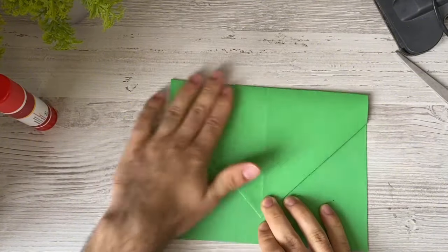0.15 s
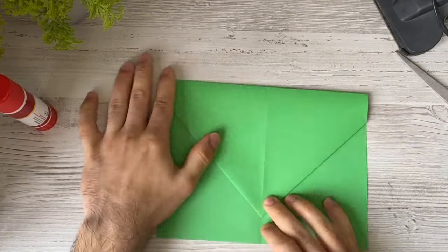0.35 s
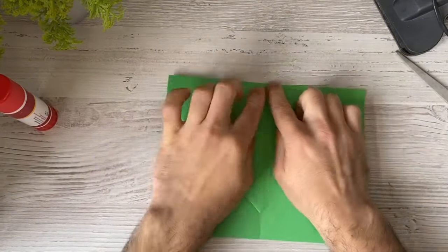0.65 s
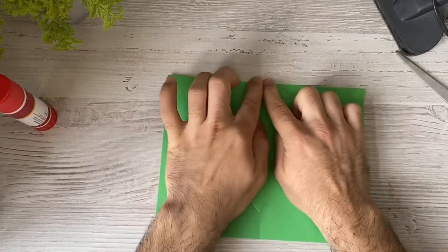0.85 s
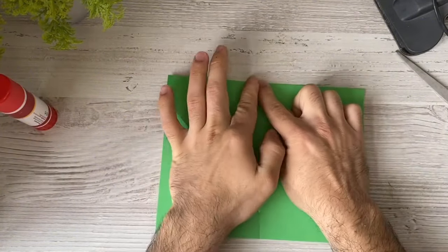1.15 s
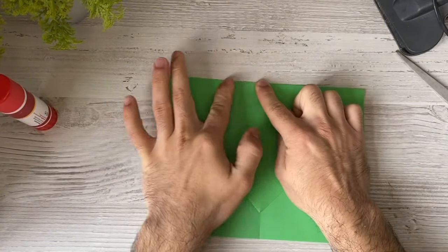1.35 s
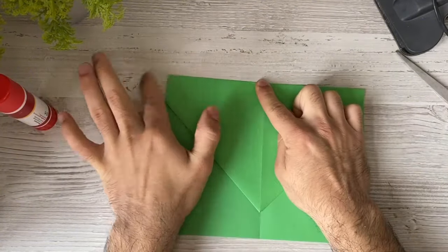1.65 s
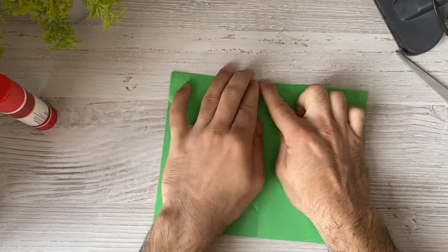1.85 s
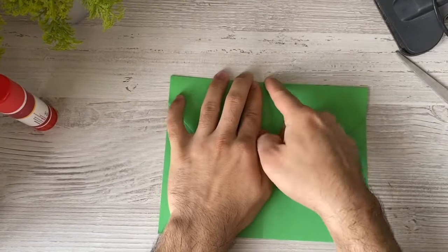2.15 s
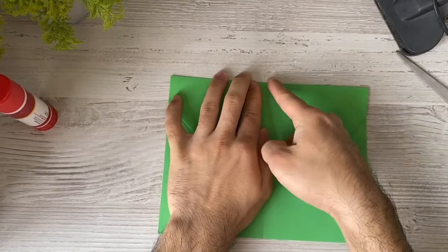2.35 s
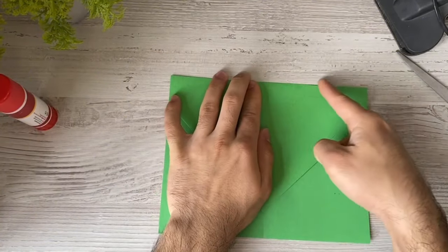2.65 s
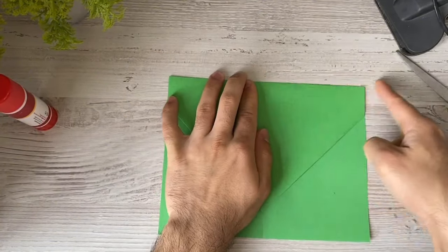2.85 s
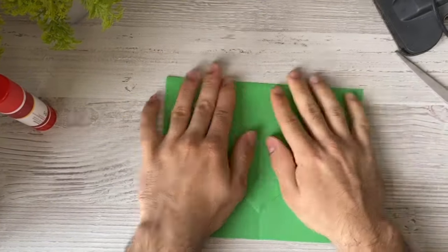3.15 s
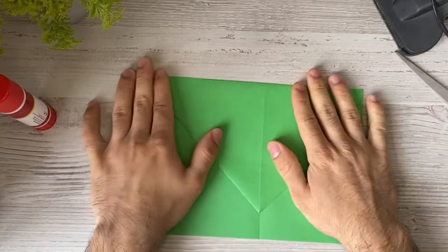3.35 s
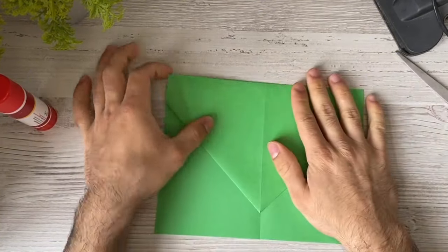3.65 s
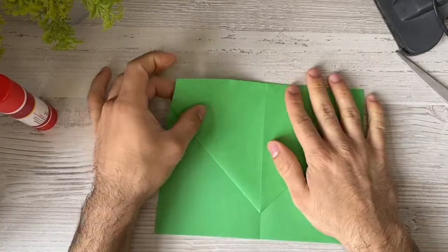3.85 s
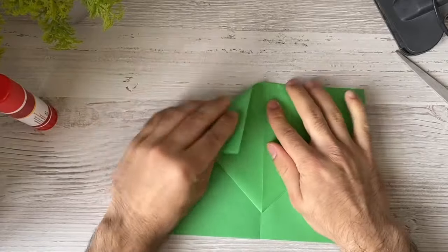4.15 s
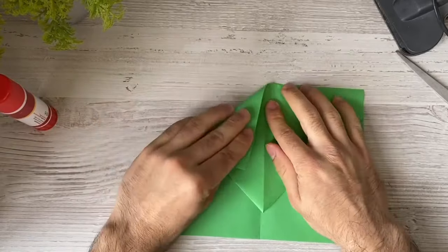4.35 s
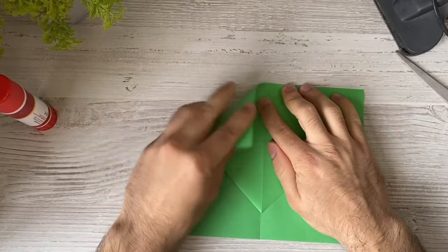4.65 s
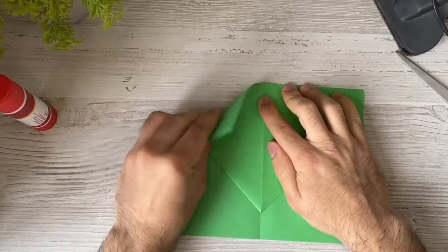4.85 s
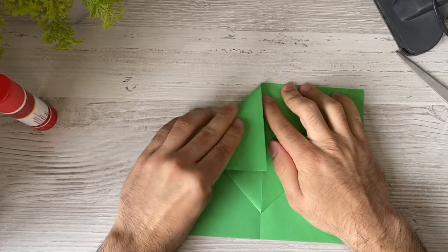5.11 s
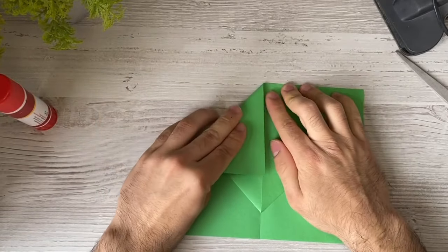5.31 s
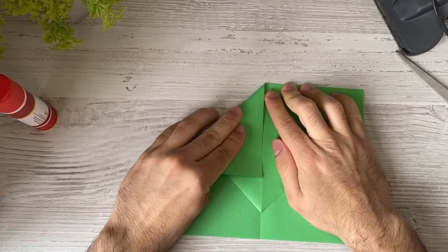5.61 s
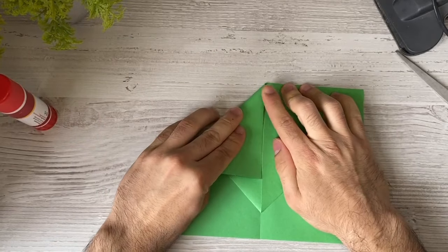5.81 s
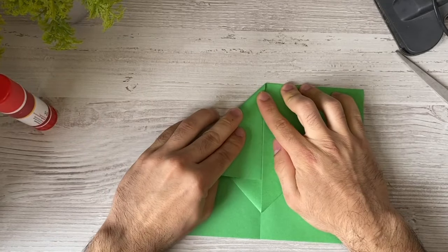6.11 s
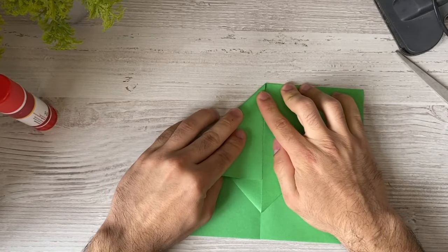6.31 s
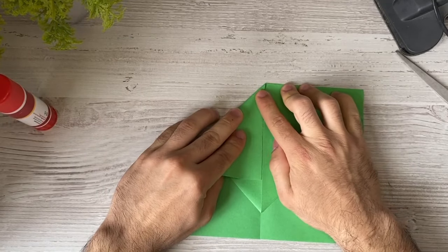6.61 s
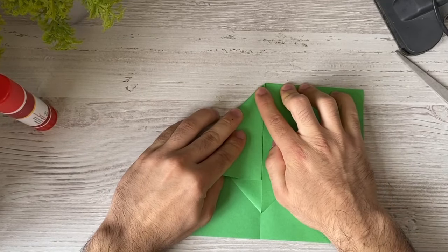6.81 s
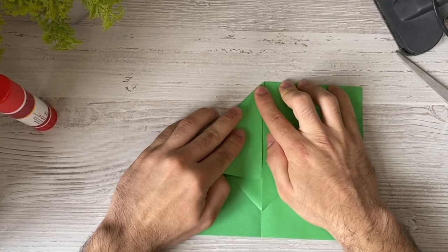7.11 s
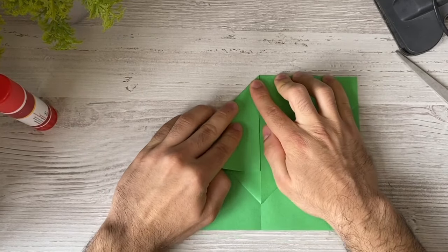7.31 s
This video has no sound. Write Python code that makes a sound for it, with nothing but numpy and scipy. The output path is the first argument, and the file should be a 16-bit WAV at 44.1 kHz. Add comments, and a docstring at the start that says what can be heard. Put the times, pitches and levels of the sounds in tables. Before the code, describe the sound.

Close up at a table in a small dry room, hands smooth stiff paper with thin skin hiss, sparse rustles and soft wooden knocks. Halfway through, a corner is folded over: a cluster of crisp crinkles and snaps, then fading presses broken by a strong pop and isolated clicks. A low wavering drone turns into a steady soft hum underneath.

```python
"""Paper smoothed and folded on a table

Hands smooth a sheet of paper on a wooden table, then bend one corner over and crease it.
Skin hisses as filtered fibre slips; paper crackles as slips through resonances and snaps as noise bursts.
Thumps and drags ring the table's damped modes; sine hum and coloured noise lie underneath.
A short noise tail makes the small room, and the stereo width is shaped by pitch."""
import sys
import numpy as np
from scipy import signal
from scipy.fft import rfft, irfft, next_fast_len
from scipy.io import wavfile
from scipy.ndimage import uniform_filter1d, map_coordinates

SR = 44100
rng = np.random.default_rng(int(sys.argv[2]) if len(sys.argv) > 2 else 0)


def bounce(signal):
    """Save signal as a 16-bit WAV file at the path given by the first command-line argument."""
    frames = np.transpose(np.atleast_2d(signal))
    limited = np.clip(frames, -1, 1)
    pcm = np.round(limited * 32767).astype(np.int16)
    wavfile.write(sys.argv[1], SR, pcm)


N = 329416
T = np.arange(N) / SR  # time in seconds


# A hand smooths the flat sheet; levels are before the swell and sag:
# start_s, length_s, skin_hiss_db, paper_crackle_db
STROKES = [(0.2, 0.2, -65.5, -75), (0.46, 0.025, -85, -70), (0.635, 0.063, -58, -63),
           (0.72, 0.41, -70.5, -65.5), (1.15, 0.39, -68.5, -68), (1.25, 0.34, -59.5, -63.5),
           (1.52, 0.073, -67, -61), (1.765, 0.18, -59, -67.5), (2.031, 0.026, -48.5, -80),
           (2.11, 0.13, -70, -81), (2.38, 0.32, -68.5, -70), (2.515, 0.038, -57.5, -64),
           (2.665, 0.24, -63, -70.5), (2.79, 0.033, -59, -62), (2.86, 0.0098, -73, -66),
           (3.04, 0.04, -66, -66.5), (3.07, 0.037, -62, -54.5), (3.185, 0.037, -53.5, -59.5),
           (3.25, 0.068, -54.5, -64.5), (3.48, 0.27, -64.5, -69), (3.775, 0.13, -58, -64.5)]
STROKE_ATTACK_S, STROKE_RELEASE_S, STROKE_SAG_DB_PER_S = 0.0076, 0.014, 21.5
# Fingers bend the corner over and press the fold; levels are before the swell and sag:
# start_s, length_s, skin_hiss_db, paper_crackle_db
PRESSES = [(3.91, 0.28, -53.5, -53.5), (4.19, 1, -61, -55.5), (4.37, 0.095, -51.5, -50.5),
           (4.54, 0.017, -49, -47.5), (4.64, 0.12, -52.5, -56.5), (4.82, 0.063, -55, -56),
           (4.93, 0.11, -71, -66), (5.07, 0.07, -60.5, -64), (5.28, 0.33, -95, -68.5),
           (5.73, 0.19, -68.5, -56), (5.89, 0.21, -61.5, -53.5), (6.14, 0.38, -78, -65.5),
           (6.5, 0.15, -66, -62), (6.83, 0.11, -62.5, -58), (6.875, 0.11, -57, -53.5),
           (7.06, 0.09, -50.5, -50.5), (7.275, 0.084, -50, -47)]
PRESS_ATTACK_S, PRESS_RELEASE_S, PRESS_SAG_DB_PER_S = 0.058, 0.028, 17
# Hands that rest on the sheet still stir it a little
REST_HISS_DB, REST_CRACKLE_DB = -81, -77.5


def handwork():
    """Gains of skin hiss and paper crackle: the powers of strokes, presses and resting hands add up."""
    strokes = moves(STROKES, STROKE_ATTACK_S, STROKE_RELEASE_S, STROKE_SAG_DB_PER_S)
    presses = moves(PRESSES, PRESS_ATTACK_S, PRESS_RELEASE_S, PRESS_SAG_DB_PER_S)
    resting = undb([[REST_HISS_DB], [REST_CRACKLE_DB]]) ** 2
    return np.sqrt(strokes + presses + resting)


def moves(rows, attack_s, release_s, sag_db_per_s, swell_share=0.13):
    """Power of (hiss, crackle) over time: each move gathers speed, eases off a little and dies away."""
    power = np.zeros((2, N))
    for start, length, skin_db, paper_db in rows:
        t = np.maximum(T - start, 0)
        swell = np.sin(np.pi / 2 * np.minimum(t / (attack_s + swell_share * length), 1))
        sag = undb(-sag_db_per_s * t)
        # the fade is centred two release times after the length is over
        fade = 1 / (1 + np.exp(np.minimum((t - length) / release_s - 2, 20)))
        power += (undb([[skin_db], [paper_db]]) * swell * sag * fade) ** 2
    return power


# The harder the paper is worked, the more the flap rings:
# crackle level at which flap and sheet are equal, and dB of flap gained per dB of crackle
TAUT_DB, TAUT_SLOPE = -55, 0.55
# Share of the crackle's power that comes in separate crinkles when the paper is taut
CRINKLE_SHARE = 0.36
# Colour of the flat sheet's crackle, relative density: pitch_hz, level_db
SHEET_COLOUR = [(200, 1), (600, -2), (950, -2), (1300, 2.5), (1600, -10), (1850, -1.5), (2250, 0.5),
                (3000, 2.5), (4200, -5.5), (5200, -3.5), (6500, -22.5), (11000, -23)]
# Resonances of the flap under the fingers, before they wander; width is for one filter pass:
# pitch_hz, width_hz, level_db
FLAP_RESONANCES = [(1340, 330, -1), (1647, 150, -3.5), (2264, 300, -4.5), (2720, 420, -8.5),
                   (3430, 400, -9), (5120, 550, -7.5)]


def bending(gain, jerk_db=2.5, shift_db=3, glide=0.05):
    """Fibres give way in jerks, now and then a whole crinkle; a taut flap rings with them."""
    slips = grains(rate=3000, spread_db=3)
    slips = slips * undb(jerk_db * walk(120))
    flap = np.zeros(N)
    # the moving fingers damp now one resonance, now another
    for hz, width, db in FLAP_RESONANCES:
        flap += undb(db + shift_db * walk(16)) * band(slips, hz, width)
    # the changing bend retunes them all: read the sound at a wandering speed
    flap = map_coordinates(flap, [np.cumsum(1 + glide * walk(18))], mode="mirror")
    sheet = unit(colour(np.roll(slips, 40), SHEET_COLOUR))  # slips shifted by 40 samples
    taut = (gain / undb(TAUT_DB)) ** TAUT_SLOPE
    crackle = (sheet + taut * unit(flap)) / np.hypot(1, taut)
    share = CRINKLE_SHARE * np.minimum(taut, 1)
    return (np.sqrt(1 - share) * crackle + np.sqrt(share) * crinkles()) * gain


def crinkles(low_hz=1150, high_hz=4600, width_share=0.67, run_s=0.0036):
    """Small patches of the sheet give way at random, each with its own pitch and size."""
    out, t = np.zeros(N), T[:SR // 40]
    count = int(110 * N / SR)  # 110 a second on average
    for when, pitch, size in rng.random((count, 3)):
        hz = low_hz * (high_hz / low_hz) ** pitch
        burst = rng.standard_normal(len(t)) * np.exp(-t / run_s)
        run = band(burst, hz, hz * width_share)
        add(out, when * T[-1], unit(run) * undb(11 * size ** 2))
    return unit(out)


# The paper buckles or is flicked; the burst's envelope peaks at rise_s, level is energy over 2.6 ms:
# start_s, level_db, rise_s, brightness_db_per_octave, flap_pitch_hz
SNAPS = [(0.397, -47.5, 0.0018, 5, 1260), (0.6423, -44, 0.00085, 3, 1450),
         (0.644, -41.5, 0.0045, 3.5, 1450), (0.655, -31, 0.0014, 5.5, 1565), (0.661, -47, 0.003, 2.5, 1380),
         (1.564, -53, 0.0024, -4, 1220), (1.588, -44, 0.0016, -3.5, 1240),
         (2.0417, -50.5, 0.0016, -4.5, 1300), (2.137, -63, 0.0016, -3, 1230),
         (2.546, -44.5, 0.0033, -0.5, 1165), (2.818, -41.5, 0.0067, 0, 1400), (2.873, -49, 0.002, -2, 1410),
         (2.882, -49, 0.003, -4, 1300), (3.084, -46.5, 0.011, 0, 1250), (3.883, -53.5, 0.001, 2, 1400),
         (4.025, -53, 0.0026, 1, 1490), (4.2357, -49, 0.002, -2, 1180), (4.249, -44.5, 0.0026, -2, 1450),
         (4.3168, -47.5, 0.0016, -3, 1130), (4.3958, -36.5, 0.0011, -2.5, 1560),
         (4.412, -40, 0.0019, 1, 1390), (4.435, -43, 0.0022, 0, 1270), (4.446, -35.5, 0.0025, 0, 1310),
         (4.4899, -32.5, 0.001, -3, 1410), (4.517, -32, 0.0015, 0.5, 1330), (4.572, -36.5, 0.0033, 9, 1530),
         (4.89, -51, 0.002, 2, 1280), (5.749, -36.5, 0.0026, 4.5, 1450), (5.752, -19, 0.0019, 1, 1474),
         (5.883, -50, 0.0012, -8, 1380), (5.9697, -32, 0.0027, -1.5, 1290), (6.376, -56, 0.003, 4, 1400),
         (6.629, -36.5, 0.0023, -0.5, 1470), (6.825, -60, 0.0011, -13, 1370), (6.933, -51, 0.002, 4, 1450),
         (6.972, -42.5, 0.0016, -5.5, 1350), (7.055, -48, 0.0016, 1, 1330), (7.082, -41, 0.0016, -14, 1290),
         (7.2655, -34.5, 0.002, -1, 1440), (7.341, -31, 0.0021, -10, 1400),
         (7.352, -29.5, 0.0034, -13, 1430), (7.376, -33.5, 0.0013, 3.5, 1470)]
# Colour of the burst before its brightness tilt, relative density: pitch_hz, level_db
BUCKLE_COLOUR = [(200, -7), (600, -13), (900, -16.5), (1200, -1), (1500, 4.5), (1870, -6), (2300, 1),
                 (3000, -0.5), (3700, -2.5), (4900, -4), (5800, -3.5), (7000, -3), (9000, -15),
                 (12000, -24.5)]
# The stiff sheet ringing after a buckle; each snap rescales pitches and decays so mode one is its pitch:
# pitch_hz, level_db, t60_s
FLAP_MODES = [(1428, 9, 0.011), (1633, -4.5, 0.017), (2253, -5.5, 0.012), (2730, -21, 0.0096),
              (3430, -12.5, 0.012), (4800, -14.5, 0.011)]


def snaps(ring_db=2, build_cycles=6):
    """Each buckle is a quick swelling run of slips; the flap rings with it, higher the tighter it is bent."""
    out, t = np.zeros(N), T[:SR // 10]
    for start, db, rise, tilt_db, pitch in SNAPS:
        swell = (t / rise) ** 1.5 * np.exp(-1.5 * t / rise)
        burst = rng.standard_normal(len(t)) * swell
        flap_time = t * pitch / FLAP_MODES[0][0]
        ring = modes(FLAP_MODES, flap_time, build_cycles, lambda hz: undb(tilt_db * np.log2(hz)))
        buckle = unit(colour(burst, BUCKLE_COLOUR, tilt_db))
        # bright flicks of the edge hardly move the flap
        snap = buckle + undb(ring_db - 2 * tilt_db) * unit(ring)
        add(out, start, blow(snap, db, seconds=0.0026))
    return out


# Colour of skin on paper, relative density: pitch_hz, level_db
SKIN_COLOUR = [(150, -51), (400, -7.5), (1300, -3.5), (3000, -1), (5500, 7.5), (7500, 5), (10500, 5),
               (12000, -2.5)]


def sliding(gain, flutter_db=1.0):
    """Skin ridges catch on paper fibres so densely that they hiss."""
    slips = grains(rate=5000, spread_db=1.5) * undb(flutter_db * walk(70))
    return unit(colour(slips, SKIN_COLOUR)) * gain


# Fingertips shift on the paper; level falls to 1/e at half_length_s from the middle:
# middle_s, half_length_s, pitch_hz, level_db
SWISHES = [(0.87, 0.016, 3350, -62), (0.975, 0.024, 3800, -64.5), (1.096, 0.037, 3480, -68),
           (1.396, 0.035, 2550, -59), (1.581, 0.017, 2270, -55.5), (2.21, 0.03, 3100, -70),
           (2.317, 0.032, 3400, -69), (2.41, 0.028, 3730, -70), (2.884, 0.011, 3050, -57),
           (6.206, 0.037, 3400, -63.5), (6.367, 0.04, 4400, -66), (6.465, 0.027, 4320, -71)]


def swishes(grain_db=3):
    """A fingertip shifts a little: a brief, grainy swish about one pitch."""
    slips = grains(rate=2400, spread_db=1.0) * undb(grain_db * walk(110))
    out = np.zeros(N)
    for middle, half, hz, db in SWISHES:
        swish = unit(band(slips, hz, hz * 0.38))
        out += swish * undb(db) * np.exp(-((T - middle) / half) ** 2)
    return out


# A flat palm sweeps across the sheet: start_s, length_s, level_db
SWEEPS = [(-0.03, 0.25, -47.5), (0.065, 0.1, -52), (3.065, 0.15, -53)]
# Colour of the palm, relative density: pitch_hz, level_db
PALM_COLOUR = [(200, -15), (440, -20), (900, -5), (1300, -18), (1800, -8), (2900, -6.5), (4200, -3.5),
               (5800, -2), (7400, -3), (9500, 1), (11500, -5)]


def sweeps(attack_s=0.015, release_s=0.021, flutter_db=0.7):
    """A whole palm slides over the sheet with a broad, even hiss that dies away as it slows."""
    gain = np.zeros(N)
    for start, length, db in SWEEPS:
        attack = np.clip((T - start) / attack_s, 0, 1)
        release = (1 - np.tanh((T - start - length) / (2 * release_s))) / 2
        gain += undb(db) * attack * release
    slips = grains(rate=11000, spread_db=1.5) * undb(flutter_db * walk(71))
    return unit(colour(slips, PALM_COLOUR)) * gain


# Stereo width of the palm by pitch: pitch_hz, side_level_db
PALM_WIDTH = [(300, 1), (2000, 0), (5000, -2), (7400, 6), (9400, -2), (10500, -20)]


def wide_palm():
    """The palm's hiss is wide: an unrelated second hiss forms the left-right difference."""
    return sweeps() + colour(sweeps(), PALM_WIDTH) * np.array([[1], [-1]])


# Thumps on the table, and one brief low bump as the hum changes; level is energy over 34 ms,
# bass weight fades above bass_hz: start_s, level_db, contact_s, bass_weight_db
TAPS = [(0.657, -33.5, 0.0015, 4), (0.665, -41.5, 0.0009, -13.5), (1.563, -53, 0.0005, -18),
        (1.589, -49, 0.00026, -1), (2.044, -37.5, 0.00058, -2), (2.079, -47, 0.00077, -8),
        (2.124, -51, 0.00047, 0), (2.138, -35, 0.00031, -3.5), (2.156, -37, 0.00064, 2),
        (2.549, -50, 0.00022, -11), (2.827, -44, 0.00084, -2), (3.089, -30.5, 0.014, -1),
        (3.105, -37, 0.016, 1), (3.875, -46, .03, -17), (4.357, -50.5, 0.00021, -4),
        (4.396, -40.5, 0.00012, 1.5), (4.518, -46.5, 0.000068, -3), (5.971, -54.5, 0.000034, -18),
        (6.952, -40.5, 0.0032, -8)]
# Modes of the table top, before each blow weights them: pitch_hz, level_db, t60_s
TABLE_MODES = [(28, -29, 0.27), (56.7, -23, 0.21), (123.6, 9, 0.094), (192.4, -5, 0.14), (314, -7, 0.12),
               (427, -6, 0.099), (555, -8.5, 0.092), (803, -3, 0.053), (902, -12, 0.037),
               (1070, -10, 0.051), (1231, -9, 0.063), (1590, -42, 0.044)]
# Colour of the dull table sound in thuds and drags, relative density: pitch_hz, level_db
DULL_COLOUR = [(70, -15.5), (140, 14), (220, -1), (320, 0.5), (440, 1), (650, -9), (820, -13.5),
               (1000, -10), (1230, -13.5), (1800, -12.5), (3000, -19), (5000, -56)]


def taps(build_cycles=0.96, thud_db=-4, thud_s=0.013, bass_hz=220):
    """A dull noise thud joins the ringing modes; the longer the contact, the fewer high modes ring."""
    out, t = np.zeros(N), T[:SR // 3]
    for start, db, contact, bass_db in TAPS:
        def soft(hz):
            """Drive at each pitch: bass weight, and treble lost to a long contact."""
            bass = undb(bass_db / (1 + (hz / bass_hz) ** 4))
            return bass / (1 + (np.pi * hz * contact) ** 2)

        ring = modes(TABLE_MODES, t, build_cycles, soft)
        dull = [(hz, level + 20 * np.log10(soft(hz))) for hz, level in DULL_COLOUR]
        thud = colour(rng.standard_normal(len(t)) * np.exp(-t / thud_s), dull)
        tap = undb(thud_db) * soft(110) * unit(thud) - unit(ring)
        add(out, start, blow(tap, db, seconds=0.034))
    return out


# A hand drags with weight on the table; level falls to 1/e at half_length_s from the middle:
# middle_s, half_length_s, level_db
DRAGS = [(0.313, 0.014, -57), (0.657, 0.0073, -39), (1.414, 0.078, -56), (1.579, 0.034, -48),
         (1.798, 0.013, -52.5), (2.553, 0.035, -46), (2.831, 0.063, -46.5), (2.874, 0.029, -53),
         (4.112, 0.25, -59), (4.397, 0.091, -50.5), (4.733, 0.05, -50), (6.994, 0.028, -53),
         (7.36, 0.13, -58.5)]


def drags(ring_db=-13, ring_tilt_db=9):
    """Stick and slip of a pressing hand makes the table top murmur and rings its upper modes."""
    weight = sum(undb(db) * np.exp(-((T - middle) / half) ** 2) for middle, half, db in DRAGS)
    slips = grains(rate=600, spread_db=1.5) * undb(2.5 * walk(90))
    top = modes(TABLE_MODES, T[:SR // 5], 0.96, lambda hz: undb(ring_tilt_db * np.log2(hz)))
    ring = unit(signal.fftconvolve(slips, top)[:N])
    murmur = unit(colour(slips, DULL_COLOUR))
    return (murmur + undb(ring_db) * ring) * weight


# Hum that turns from a wavering drone to a steady tone; level and pitch waver before the turn:
# pitch_hz, before_db, after_db, waver_before_hz
HUM = [(54.7, -57, -100, 2.28), (83.4, -45.5, -82, 2.53), (79.7, -79.5, -50, 1.17),
       (99.6, -55.5, -40.5, 0.41), (126.6, -53, -60.5, 3.18), (199.9, -65.5, -63.5, 0.036),
       (298, -85.5, -72.5, 0.19)]
HUM_TURN_S = 3.88
# Colour of the room's rumble, relative density: pitch_hz, level_db
AIR_COLOUR = [(20, -37), (40, -3.5), (57, -6), (70, -4), (90, 5.5), (128, -3.5), (160, -7.5), (200, -11),
              (240, -18.5), (400, -18), (700, -26.5), (1500, -29.5), (3000, -38), (6000, -63), (12000, -67)]
AIR_DB = -53  # the part shared by both channels, before its flicker


def background(wide_hz=650, flicker_db=1):
    """Appliance hum and the rumble of the room, alike in both channels in the bass."""
    after = np.clip((T - HUM_TURN_S) / 0.028 + 0.5, 0, 1)  # a 28 ms crossfade
    hum = np.zeros(N)
    for hz, before_db, after_db, waver_hz in HUM:
        wavering_hz = hz + waver_hz * (1 - after) * walk(9)
        phase = 2 * np.pi * (np.cumsum(wavering_hz) / SR + rng.random())
        before = undb(before_db + 1.5 * walk(8))
        level = before * (1 - after) + undb(after_db) * after
        hum += np.sqrt(2) * np.sin(phase) * level
    mid = unit(colour(rng.standard_normal(N), AIR_COLOUR))
    side = unit(colour(rng.standard_normal(N), AIR_COLOUR))
    side = highpass(side, wide_hz, order=1)
    air = mid + 1.28 * side * np.array([[1], [-1]])
    return hum + undb(AIR_DB + flicker_db * walk(4.4)) * air


ROOM_T60_S = 0.13


def room(x, wet_db):
    """The direct sound plus a short diffuse tail, unrelated in the two channels."""
    t = T[:SR // 2]
    # the tail starts after 4 ms
    tail = rng.standard_normal((2, len(t))) * undb(-60 * t / ROOM_T60_S) * (t > 0.004)
    tail /= np.sqrt(np.sum(tail ** 2, axis=1, keepdims=True))
    tail = highpass(tail, 280)
    return x + undb(wet_db) * signal.fftconvolve(np.atleast_2d(x), tail, axes=1)[:, :N]


def wide(make, side_db, wide_hz):
    """A second run of the same source, its random parts drawn anew, widens it in stereo, except in the bass;
    parts with no randomness, such as a table's ring, come out alike and are only panned."""
    side = highpass(make(), wide_hz)
    return make() + undb(side_db) * side * np.array([[-1], [1]])


# Stereo width by pitch: pitch_hz, side_level_db
STEREO_WIDTH = [(200, -8), (600, 2.5), (1350, -3.5), (2900, -0.5), (4400, 1), (5100, -20), (6000, 7),
                (7300, -36), (8800, -6), (9800, -12)]
# Phase turn of the right channel by pitch: pitch_hz, turn_radians
RIGHT_TURN = [(2100, 0), (2800, 1.47), (5400, 0.05), (6300, 3.5), (6800, 3), (8000, 3.5), (8600, 4.5),
              (9300, 6.5)]


def stereo(dry):
    """Shapes the stereo width band by band and turns the right channel's phase by pitch."""
    mid = (dry[0] + dry[1]) / 2
    side = colour((dry[0] - dry[1]) / 2, STEREO_WIDTH)
    turn = np.interp(np.arange(N + 1) * SR / (2 * N), *np.transpose(RIGHT_TURN))
    right = irfft(rfft(mid - side, 2 * N) * np.exp(-1j * turn))[:N]
    return np.array([mid + side, right])


def undb(db):
    """Decibels to an amplitude factor."""
    return 10 ** (np.asarray(db) / 20)


def unit(x):
    """Scale to rms 1."""
    return x / np.sqrt(np.mean(x ** 2))


def walk(rate):
    """Smoothed random drift of rms 1, with a new value drawn rate times a second."""
    k = int(SR / rate)
    steps = np.repeat(rng.standard_normal(N // k + 1), k)
    return unit(uniform_filter1d(steps, k)[:N])


def grains(rate, spread_db):
    """Tiny slips of fibres at random moments, rate a second, a few much larger than the rest."""
    size = undb(spread_db * np.minimum(rng.exponential(size=N), 4))
    return unit((rng.random(N) < rate / SR) * size * rng.choice([-1, 1], N))


def colour(x, points, tilt_db=0):
    """Minimum-phase filter through (Hz, dB) points, tilted in dB per octave."""
    n = next_fast_len(len(x) + 4096, True) // 2 * 2
    octave = np.log2(np.maximum(np.arange(n // 2 + 1) * SR / n, 1))
    hz, db = np.transpose(points)
    db = np.interp(octave, np.log2(hz), db + tilt_db * np.log2(hz / hz[0]))
    # folding the cepstrum makes the filter causal
    cepstrum = irfft(np.log(undb(db)))
    cepstrum[1:n // 2] *= 2
    cepstrum[n // 2 + 1:] = 0
    return irfft(rfft(x, n) * np.exp(rfft(cepstrum)))[:len(x)]


def band(x, hz, width):
    """A resonance applied twice, for steep skirts."""
    b, a = signal.iirpeak(hz, hz / width, fs=SR)
    return signal.lfilter(b, a, signal.lfilter(b, a, x))


def highpass(x, hz, order=2):
    """Butterworth filter that takes the bass away."""
    return signal.sosfilt(signal.butter(order, hz, "high", fs=SR, output="sos"), x)


def modes(table, t, build_cycles, weight):
    """Damped modes that take a few cycles to swing up; weight(Hz) is how hard each is driven."""
    hz, db, t60 = np.transpose(table)[:, :, None]
    ring = np.exp(-np.log(1000) * t / t60) * (1 - np.exp(-t * hz / build_cycles))
    return np.sum(weight(hz) * undb(db) * ring * np.sin(2 * np.pi * hz * t), axis=0)


def blow(x, db, seconds):
    """Scale a short sound so that its energy equals db held for the given time."""
    return x * undb(db) * np.sqrt(seconds * SR / np.sum(x ** 2))


def add(out, s, x):
    """Mix a short sound in at time s."""
    i = int(s * SR)
    out[i:i + len(x)] += x[:len(out) - i]


def scene():
    """Skin, paper and table heard close, in a small dry room."""
    hiss, crackle = handwork()
    paper = room(bending(crackle), wet_db=-1.5) + room(snaps(), wet_db=-6.5)
    skin = room(wide(lambda: sliding(hiss), side_db=-5.5, wide_hz=400) + swishes(), wet_db=-22)
    knocks = room(wide(taps, side_db=-9.0, wide_hz=390), wet_db=-16)
    rubs = room(wide(drags, side_db=-10.0, wide_hz=380), wet_db=-3)
    # the palm bypasses the room and the stereo shaping
    return stereo(skin + paper + knocks + rubs + background()) + wide_palm()


TOP_HZ = 11800


def record(dry):
    """A steep elliptic lowpass cuts the top."""
    return signal.sosfilt(signal.ellip(10, 0.2, 80, TOP_HZ, fs=SR, output="sos"), dry)


dry = scene()
out = record(dry)
bounce(out)
```